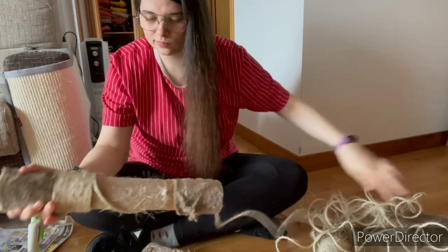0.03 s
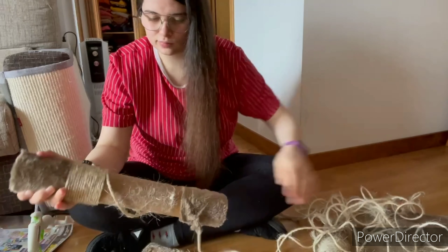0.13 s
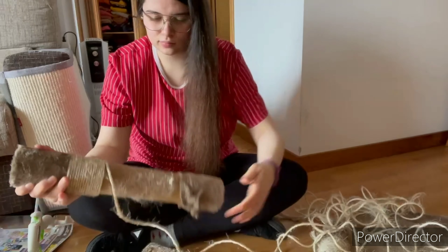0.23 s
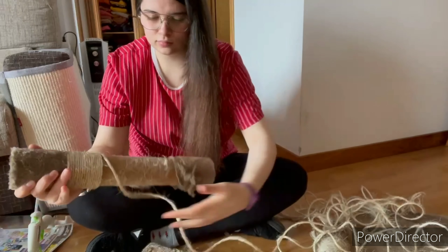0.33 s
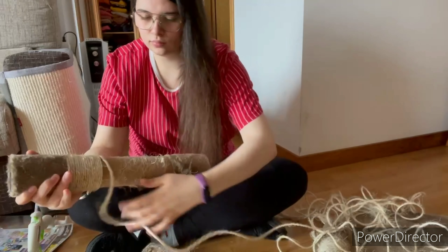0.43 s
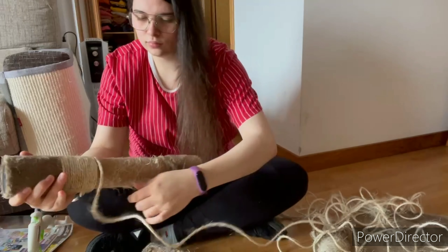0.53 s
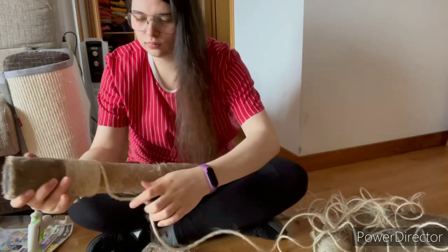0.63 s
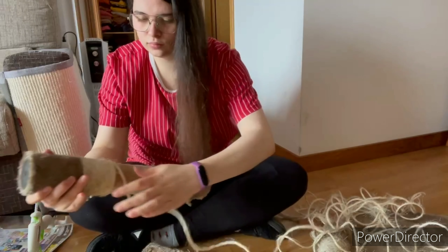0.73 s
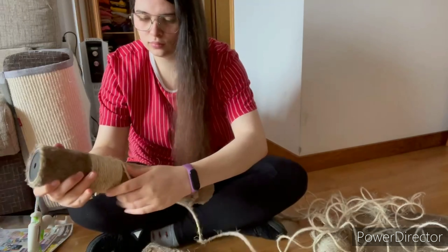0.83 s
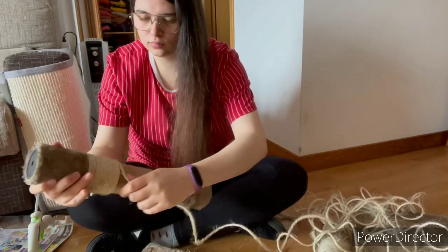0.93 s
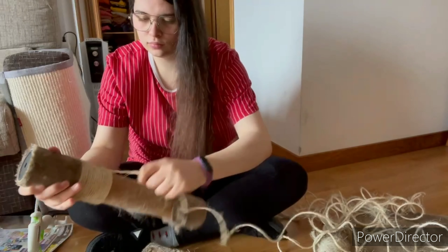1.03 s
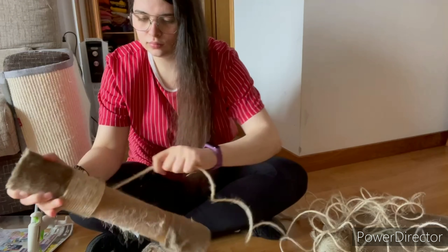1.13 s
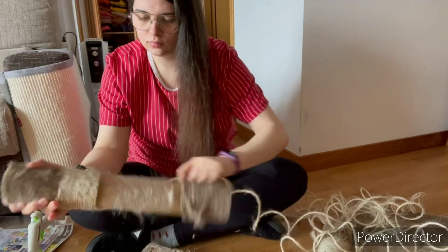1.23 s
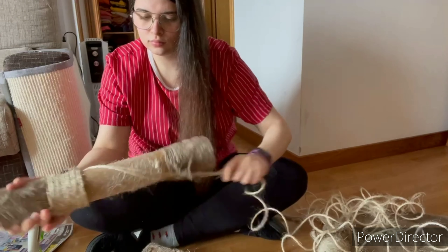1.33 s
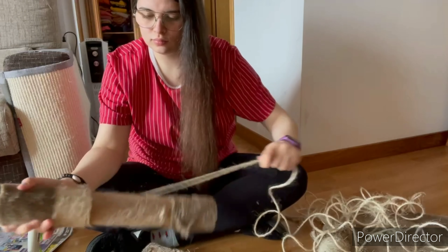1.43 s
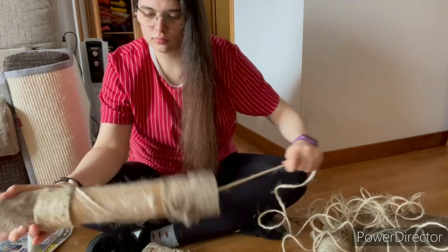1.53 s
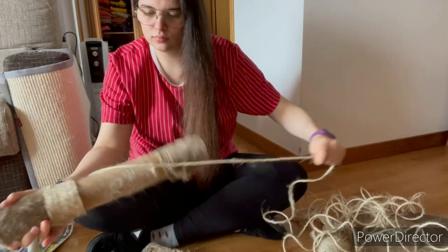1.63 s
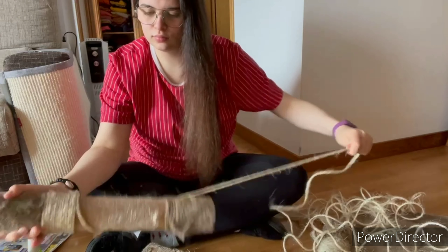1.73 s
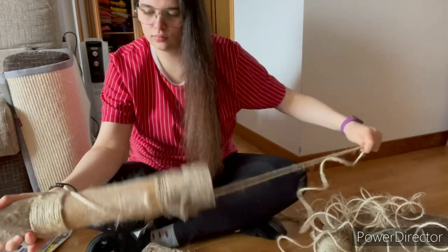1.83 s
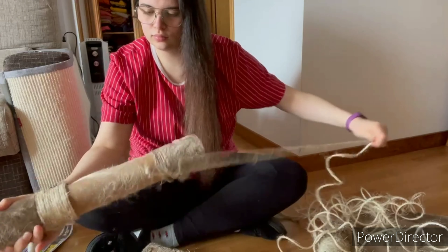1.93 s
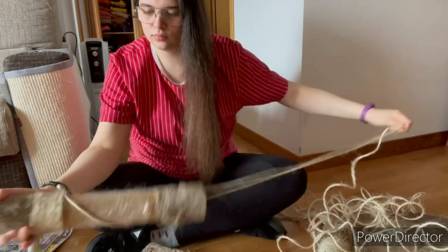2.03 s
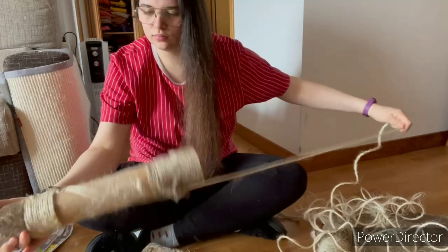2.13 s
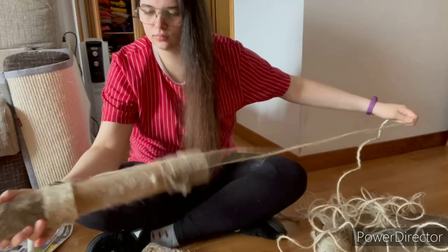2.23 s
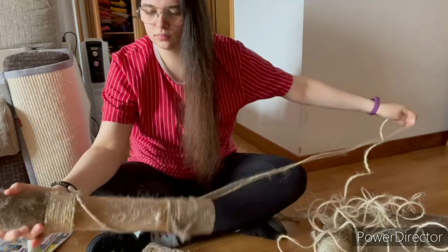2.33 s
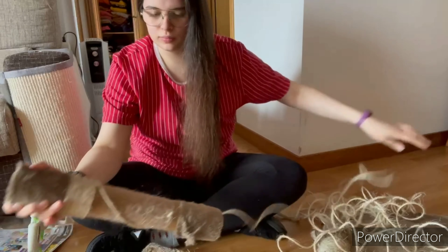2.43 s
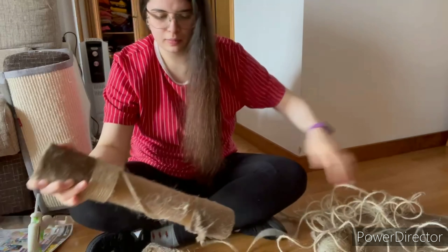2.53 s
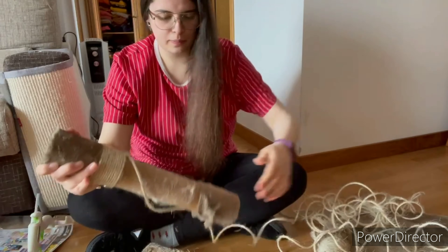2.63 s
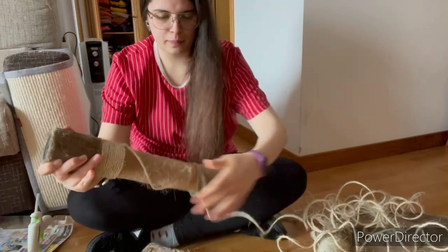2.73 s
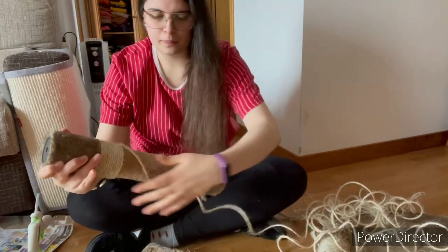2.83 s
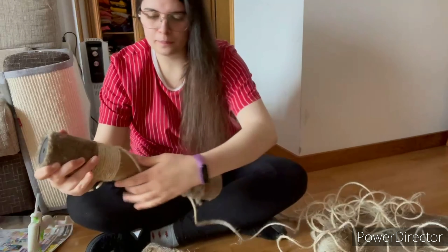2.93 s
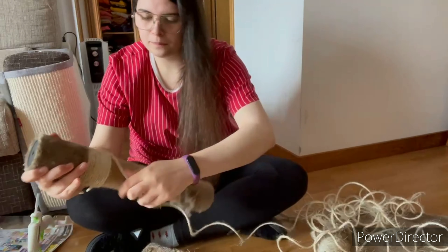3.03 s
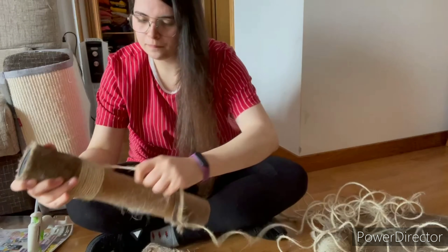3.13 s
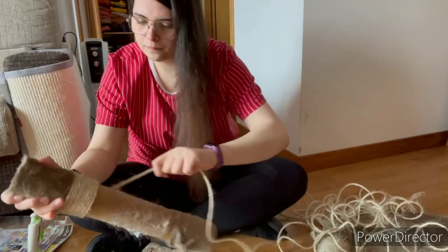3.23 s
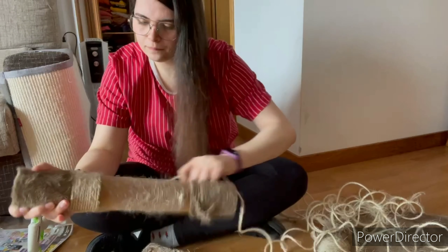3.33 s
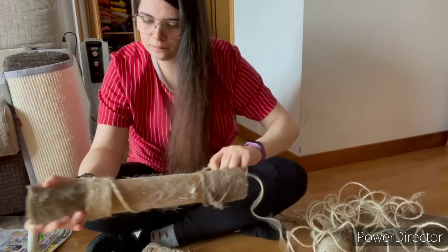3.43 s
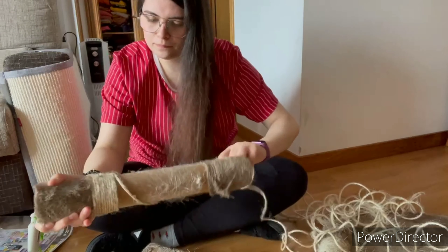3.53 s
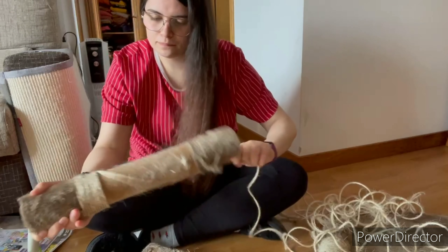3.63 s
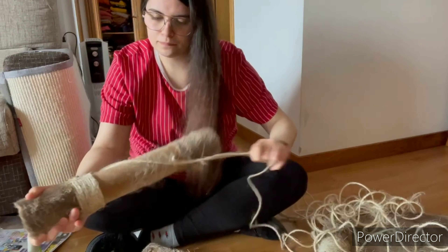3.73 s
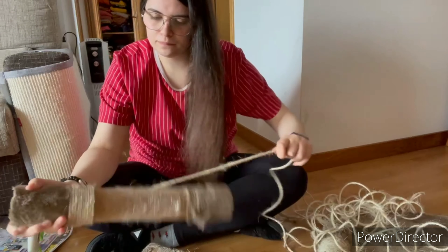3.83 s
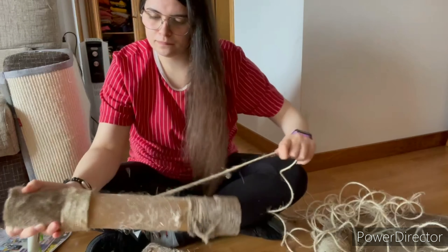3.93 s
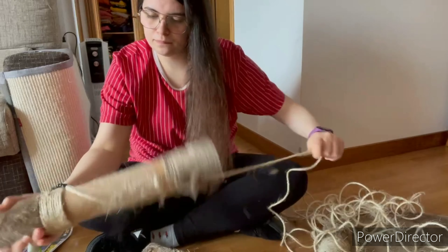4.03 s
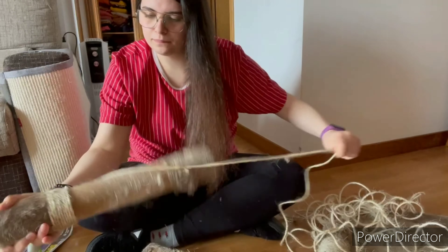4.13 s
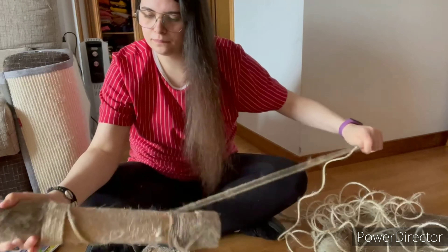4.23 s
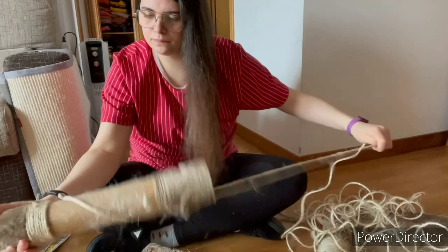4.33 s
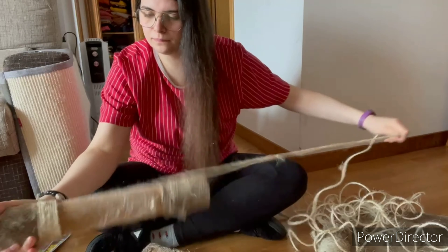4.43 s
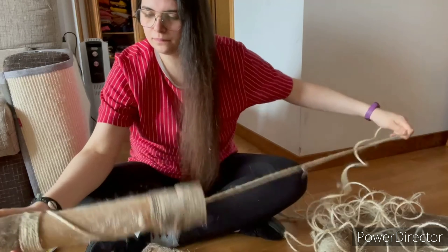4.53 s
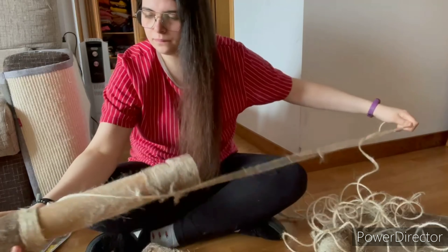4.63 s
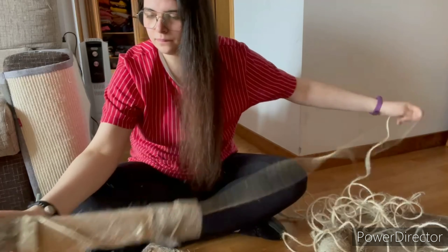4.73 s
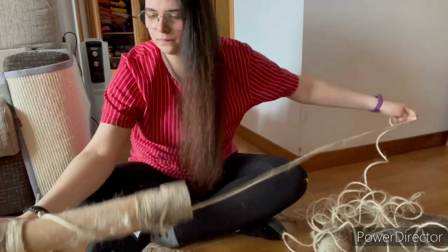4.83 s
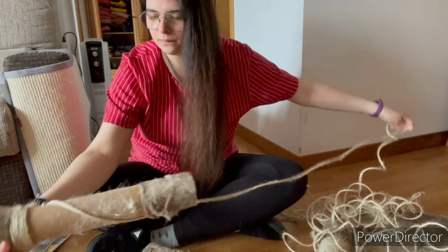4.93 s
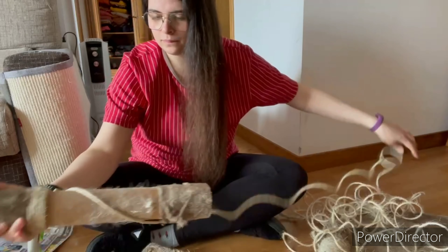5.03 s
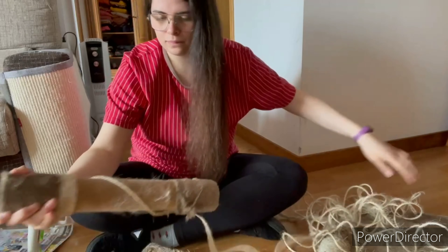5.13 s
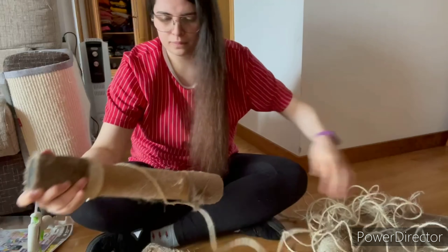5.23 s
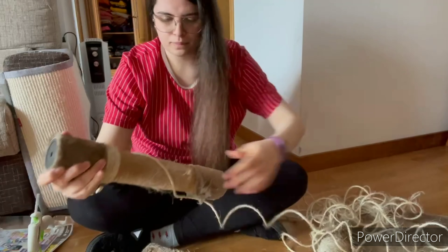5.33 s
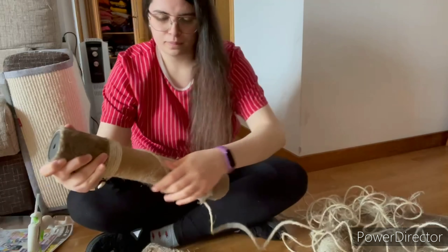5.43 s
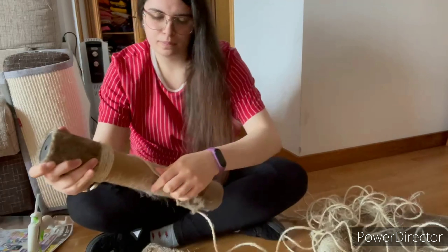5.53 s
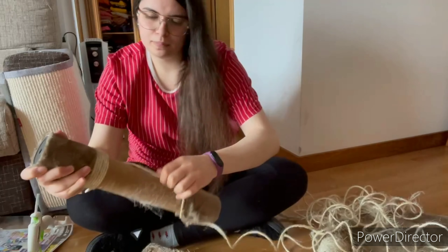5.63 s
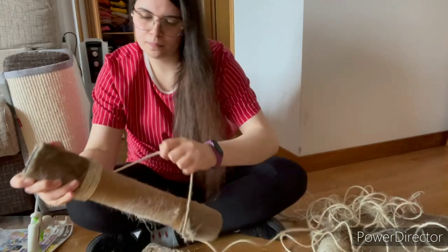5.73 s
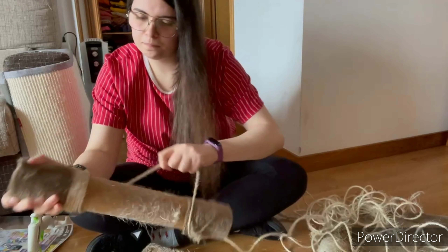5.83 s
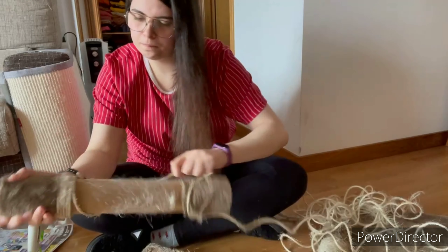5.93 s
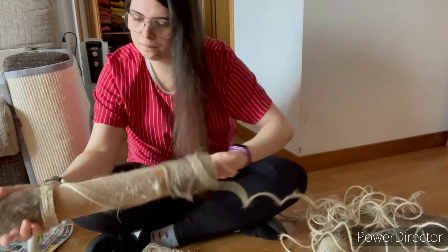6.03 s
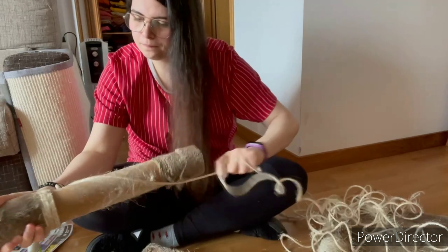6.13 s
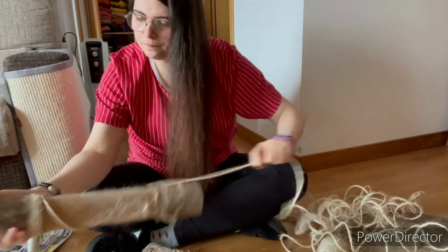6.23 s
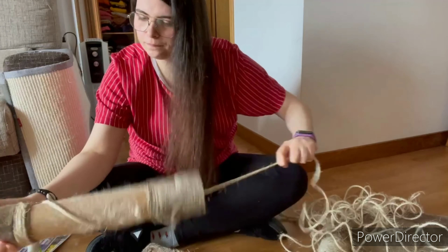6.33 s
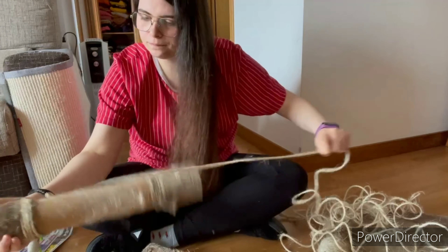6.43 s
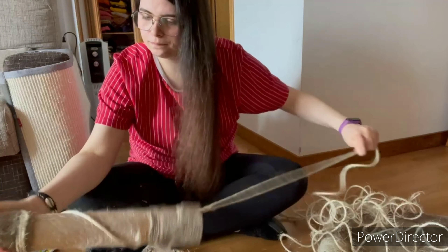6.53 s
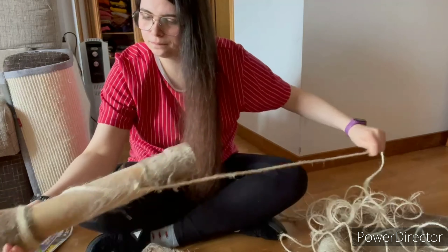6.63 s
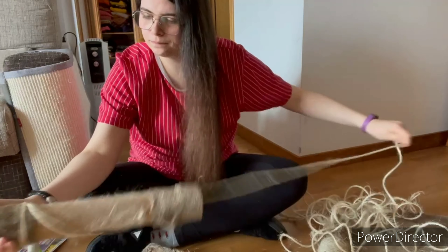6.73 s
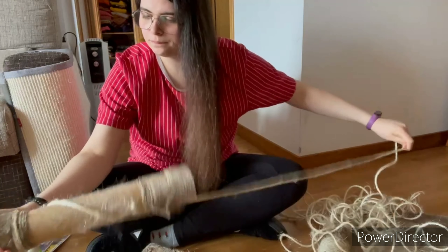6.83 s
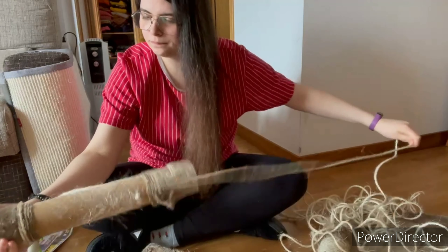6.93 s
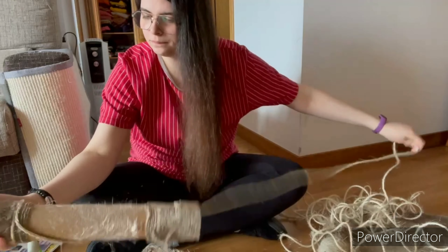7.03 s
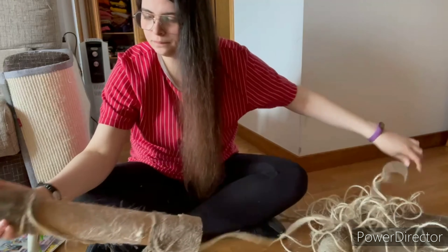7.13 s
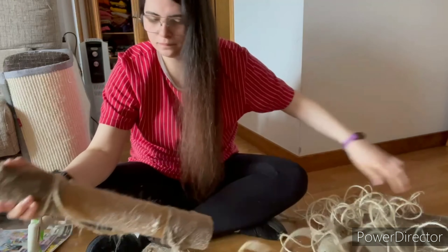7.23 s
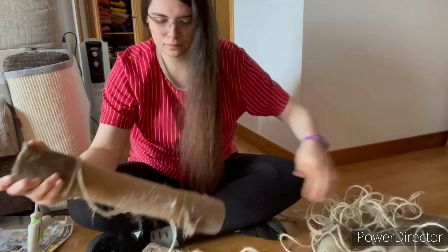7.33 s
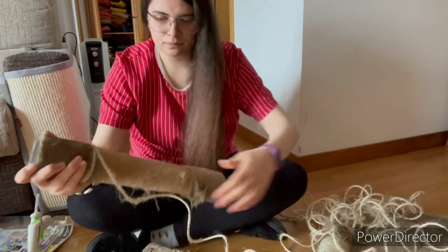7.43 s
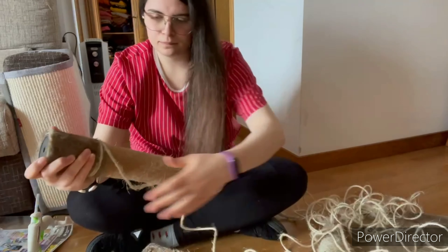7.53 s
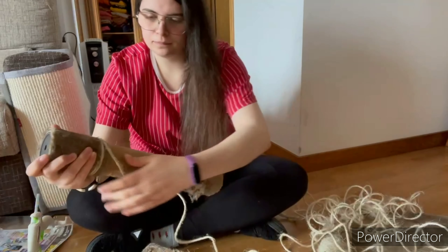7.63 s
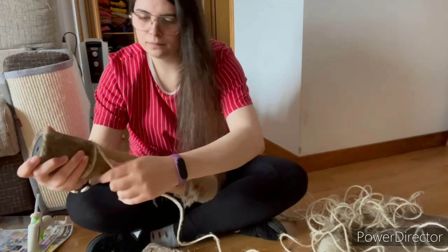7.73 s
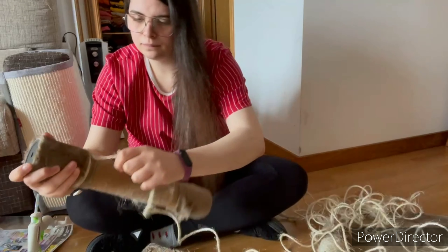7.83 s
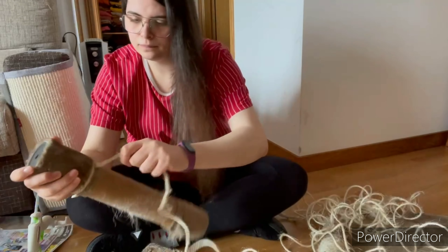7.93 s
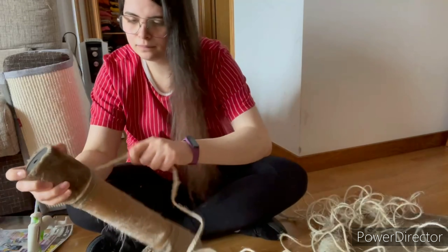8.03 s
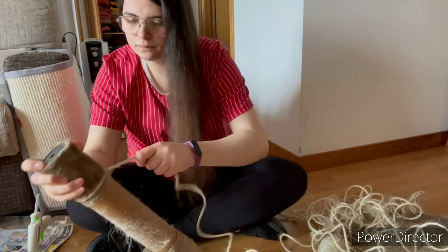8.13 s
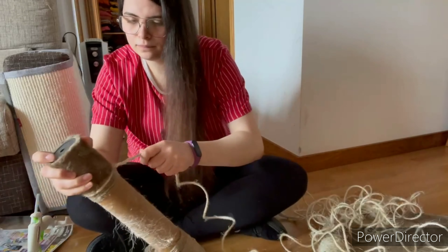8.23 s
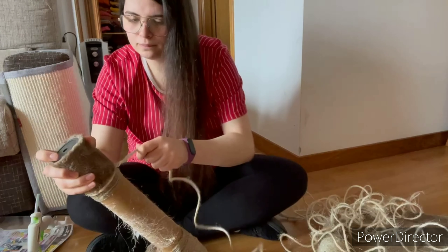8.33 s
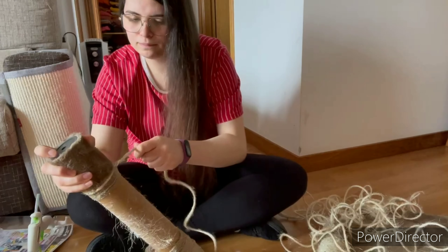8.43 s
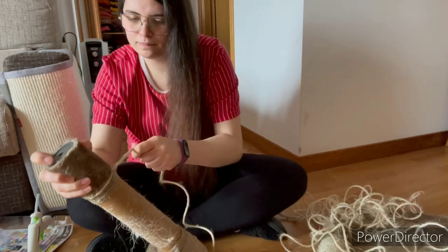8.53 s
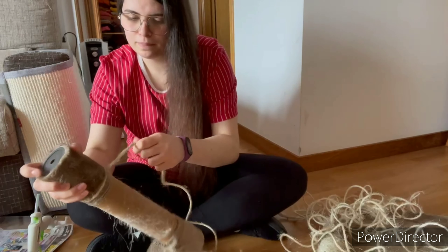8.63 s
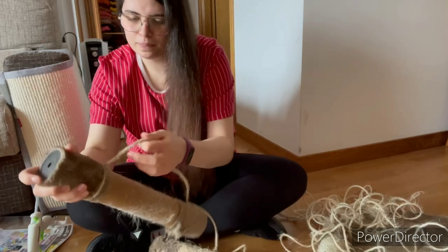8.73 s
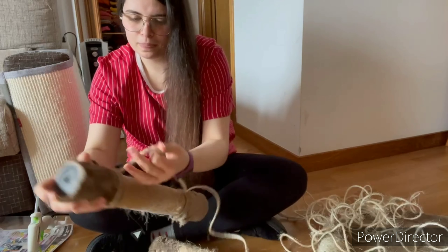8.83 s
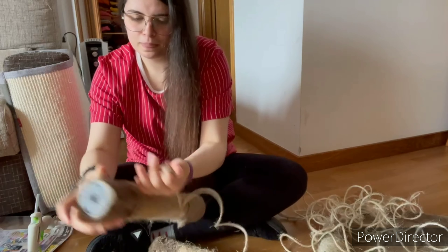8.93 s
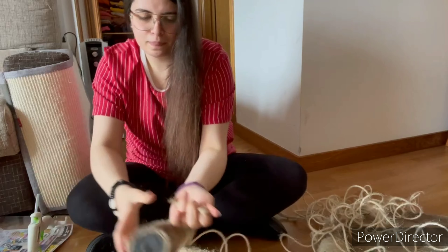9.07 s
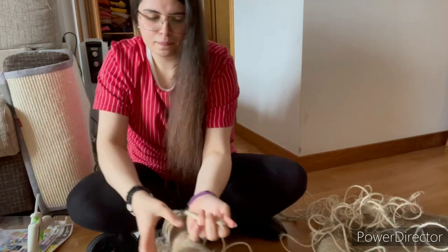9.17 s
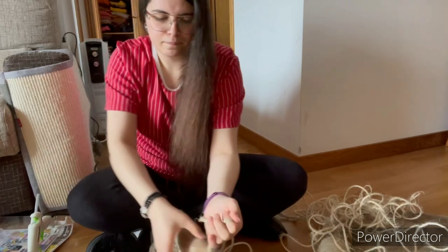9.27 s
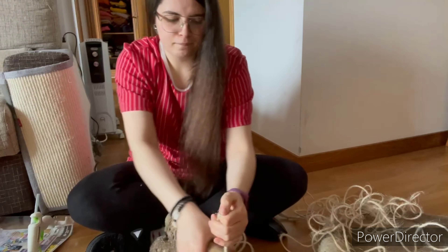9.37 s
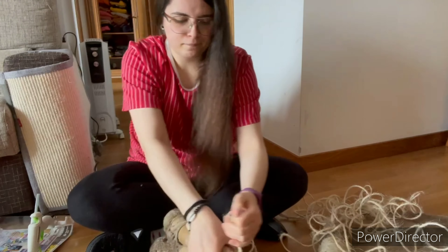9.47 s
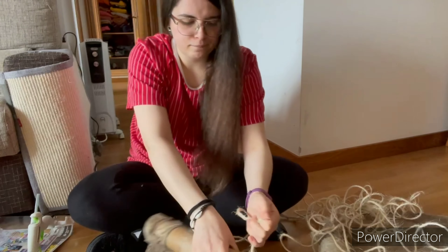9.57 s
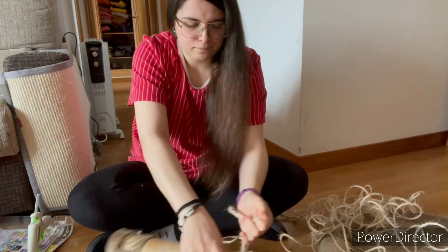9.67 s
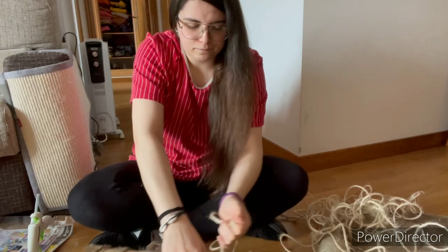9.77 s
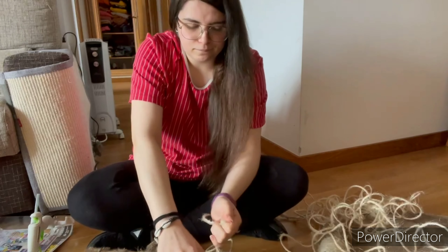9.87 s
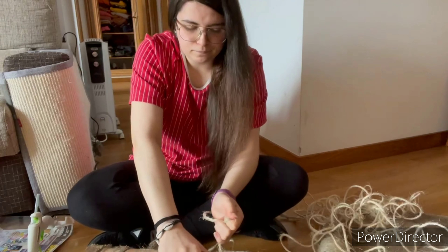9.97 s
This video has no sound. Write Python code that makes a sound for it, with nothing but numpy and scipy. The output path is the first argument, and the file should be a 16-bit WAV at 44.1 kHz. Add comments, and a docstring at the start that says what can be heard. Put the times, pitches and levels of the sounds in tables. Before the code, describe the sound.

Three close, dry ripping pulls of stiff rope from a glued tube, separated by soft handling and bumps, then faint rustles and a final thud.

```python
"""Old sisal rope is pulled off a cardboard scratching post in a small bare room, close enough that the direct
sound outweighs the reverberation. Glue and fibres tear as noise bursts that ring the resonances of the hollow tube.
Before, between and after three long pulls the rope rustles and fingers rub and squeak; during the pulls and
outside them fibres tick, strands crack, and the post knocks on hands and floor as decaying modes.
Floor rumble and quiet room noise lie underneath.
A phone with two microphone ports listens; its treble reaches the ports out of step."""
import sys
import numpy as np
from scipy import signal
from scipy.fft import rfft, irfft, next_fast_len
from scipy.io import wavfile
from scipy.ndimage import uniform_filter1d, map_coordinates

SR = 44100
rng = np.random.default_rng(int(sys.argv[2]) if len(sys.argv) > 2 else 0)


def dump(signal):
    """Clip the signal to [-1, 1] and save it as 16-bit WAV at the path in sys.argv[1]."""
    limited = np.clip(np.atleast_2d(signal).T, -1, 1)
    pcm = np.round(limited * 32767).astype(np.int16)
    wavfile.write(sys.argv[1], SR, pcm)


N = 441000

# All level_db columns are relative: the functions add the gain of each layer.
# floor boards under the moving body: [start_s, level_db]
RUMBLE = [(0.0, -68), (0.47, -74), (0.53, -61.5), (0.8, -76), (1.42, -63), (1.92, -66), (2.36, -58.5),
          (2.48, -72), (3.31, -88.5), (3.42, -59), (3.56, -67), (4.51, -58.5), (4.79, -63.5), (4.93, -57.5),
          (5.26, -75), (6.13, -59), (6.29, -75), (6.35, -65.5), (8.1, -76), (8.19, -55.5), (8.8, -83),
          (9.16, -62), (9.3, -70), (9.83, -74), (9.94, -51), (10.0, -51)]
# rumble spectrum: [frequency_hz, level_db]
BOARDS = [(25, -25), (38, -8.5), (48, -3), (60, -9), (95, -12.5), (130, -43.5)]
SHIFT_DB, SHIFT_RATE = 3, 6  # weight shifts on the boards: depth in dB, random knots per second
# one floor mode hums while the body leans over: [start_s, level_db]
SWAY = [(8.84, -85), (8.95, -67), (9.1, -61), (9.45, -62.5), (9.6, -66), (9.8, -72), (9.9, -80)]
SWAY_HZ, SWAY_WAVER_HZ = 48, 2.5  # centre pitch, scale of its random waver
# quiet room spectrum: [frequency_hz, level_db]
HUSH = [(25, -14.5), (60, 3.5), (200, -0.5), (500, -9), (1000, -10.5), (2500, -23.5), (5000, -26),
        (11000, -25), (11900, -46)]

# hands and loose rope before, between and after the pulls: [start_s, rustle_level_db, treble_over_it_db,
# low_rasp_over_it_db]
HANDLING = [
    [(0.0, -67.5, -12.5, -6), (0.172, -100.5, -5, 7), (0.484, -94, -19, -5), (0.534, -62, -1.5, -9.5),
     (0.69, -99, -18, 5), (0.848, -94, -23, 2), (0.87, -77.5, 5, -20), (0.93, -62.5, -8.5, -14),
     (0.962, -55.5, 4, -5), (1.05, -79, -5, 8)],
    [(2.56, -89, 1.5, -16.5), (2.586, -81, -3, 18), (2.596, -53, -28, -3), (2.744, -83, -20, 10),
     (2.792, -104, -11, 5), (2.97, -102, -11, -7), (2.992, -75.5, 8, -28), (3.076, -69.5, 2.5, -26),
     (3.112, -85, 7, 0), (3.16, -75.5, -1, -15)],
    [(5.11, -86.5, 2, 3), (5.504, -93.5, -4.5, 8.5), (5.53, -65, -0.5, -4), (5.58, -65, -4, -5),
     (5.604, -42.5, -6.5, -10), (5.678, -73, -3, 0.5), (5.716, -58, -6, -2), (5.732, -68.5, -10, -1),
     (5.798, -57.5, -9.5, -9.5), (5.84, -59, -11, 2)],
    [(7.31, -91, 17, 5), (7.326, -69.5, -6, 7), (7.408, -78.5, 4, -7), (7.42, -60.5, -24, 3.5),
     (7.63, -88.5, -20, 8), (7.67, -70.5, -19, 7), (7.754, -70, -0.5, 7.5), (7.812, -54, -19, 0.5),
     (7.884, -77.5, -1, -2), (8.04, -64, -15, -10)],
    [(8.06, -50, -11.5, -3), (8.094, -60, -6, -7), (8.21, -72, -7, -2.5), (8.444, -83.5, -5.5, 8.5),
     (8.51, -93.5, 14.5, 16), (8.546, -97, 6, -14), (8.658, -72.5, -6.5, -5), (8.784, -82.5, 3, -21),
     (8.8, -88, 5, -7), (9.0, -80, 9.5, -23)],
    [(9.01, -71, 2.5, -10), (9.094, -78.5, 3, -13), (9.108, -63, -10.5, -8), (9.31, -74.5, -4, -5),
     (9.37, -70, -1, -11), (9.385, -65, -6, -6), (9.53, -66.5, -4.5, -3), (9.704, -63, -12, 0),
     (9.724, -71.5, -8, -2), (9.852, -69.5, -1, -5), (9.88, -58, -10, 1), (10.0, -66, -8, -2)],
]
# the three long pulls: [start_s, tear_level_db, then over it: tube_boom_db, low_rasp_and_second_resonance_db,
# treble_db]
PULLS = [
    [(1.05, -66.5, -15, -13, -1), (1.112, -49.5, -3, -2, -11), (1.15, -63, 6, -4, -1.5),
     (1.186, -55.5, 11.5, 2.5, 0), (1.22, -57.5, 10, 3.5, 4), (1.238, -50.5, 4, 5, -4),
     (1.254, -55, 0, 6.5, 1), (1.308, -43, -13, -9, 0), (1.324, -47, -2, 1, -5),
     (1.35, -40.5, -16.5, -5.5, -7.5), (1.374, -40, -2.5, -13, -6.5), (1.488, -50, -9.5, 0.5, -6),
     (1.53, -39.5, 2.5, -3.5, -6), (1.562, -46.5, -0.5, -7, -10), (1.6, -42.5, -13, -4, -6),
     (1.738, -42.5, -11.5, -13, -8), (1.796, -35.5, -10, -2.5, -9.5), (1.848, -44.5, -9.5, -10, -4.5),
     (1.91, -41, -10.5, -3, -11.5), (1.952, -48.5, -7.5, -12, -8.5), (2.01, -42, -15, 0, -8),
     (2.11, -39, -5.5, -0.5, -5.5), (2.16, -48, -4.5, -6, -6), (2.224, -37.5, -12.5, -12.5, -10.5),
     (2.278, -53, -16.5, -6.5, -4), (2.29, -49, -14, -9, -7), (2.324, -52, -6, 1.5, -3),
     (2.378, -44.5, -5, 3.5, -4.5), (2.524, -81.5, -17, -1.5, -4), (2.55, -89, -1, 4, -5)],
    [(3.17, -69, -31, -10, -4), (3.256, -50.5, 6, -3.5, -2), (3.336, -55, 5, 0.5, -1),
     (3.346, -50.5, -7.5, -4.5, -5), (3.416, -44.5, -1, 4, -6), (3.448, -50, -2.5, 1, -5),
     (3.572, -75, -9, 6, -6), (3.604, -47, -6, 0, -17), (3.652, -69.5, 0, -3.5, -1),
     (3.668, -54, -22, -2, -5), (3.894, -42.5, -6.5, -8.5, -8.5), (3.976, -58.5, 1.5, 1.5, -7),
     (4.056, -40, -17, -5.5, -5), (4.186, -49.5, -19.5, -1.5, -7.5), (4.276, -43.5, -0.5, 3, -6.5),
     (4.314, -57, -3.5, -8, -10), (4.33, -44.5, -13, -11, -6), (4.546, -43.5, -15.5, 1, -9.5),
     (4.594, -39.5, 3.5, -1, -7), (4.632, -53.5, 0.5, -8, -8), (4.658, -43, -34, -16, -11.5),
     (4.696, -45.5, -7, -6, -5), (4.718, -43.5, -22, -21, -15), (4.744, -53, -5, -19, -7.5),
     (4.772, -42.5, -9, -9, -6.5), (4.836, -55, -4, 1.5, -3), (4.858, -45, -10, -4, -6.5),
     (4.89, -51.5, -5.5, 3, -12), (4.96, -60.5, -7.5, -3, -13), (5.1, -80, 0, 11.5, -1.5)],
    [(5.85, -57.5, -5, -2, -3.5), (5.908, -54.5, 5, -2, -3.5), (5.97, -45.5, -15, -4, -7),
     (6.012, -51.5, -2.5, -10.5, -8), (6.02, -42, -15, -9, -8), (6.036, -54, -4.5, 6, -3),
     (6.072, -44, -24, -1, -10.5), (6.102, -48.5, 2, -13.5, -6), (6.246, -46.5, -22.5, -3, -7.5),
     (6.262, -39.5, -26, -1, -11), (6.282, -46, -12.5, -5.5, -7.5), (6.388, -41.5, -15.5, -11.5, -7),
     (6.466, -52, -3.5, 8, -4), (6.488, -40, -17.5, -17, -13), (6.574, -49.5, -8.5, 4.5, -2),
     (6.602, -43.5, -7, -1, -6), (6.66, -67, -7.5, -8, -4), (6.684, -44.5, -4, -3.5, -11),
     (6.746, -58.5, -11, -8, -5), (6.762, -46, -15.5, -1.5, -9), (6.852, -41, -9, 0, -4.5),
     (6.87, -40, -5, -3, -14), (6.874, -50, -5, 5, -9), (6.968, -57.5, -15, -3.5, -8.5),
     (6.988, -47.5, -14, 0, -9), (7.03, -55.5, 0, 6.5, -1), (7.078, -57.5, -16, 8.5, 1),
     (7.096, -67.5, 0, -1, 1), (7.168, -71, -20, 5, 0), (7.25, -100, 29.5, -1, 11.5)],
]
# gains while pulling: rasp_db, second_db and fizz_db over their columns, third_db over the tear level
PULL_COLOUR = {"rasp_db": -5.5, "second_db": -13, "third_db": -18, "fizz_db": 3.5}
# tube resonance gains while handling, over the rustle level: boom_db, second_db, third_db
HAND_COLOUR = {"boom_db": -6.5, "second_db": -10.5, "third_db": -13}
GRIP_DB, GRIP_RATE = 3, 11  # the shifting grip damps or frees resonances: depth in dB, random knots per second
# spectra of low rasp, tear and treble: [frequency_hz, level_db]
RASP = [(60, -39.5), (150, -7.5), (280, -15), (450, -9), (700, -1.5), (900, -5), (1400, -19)]
TEAR = [(700, -58.5), (900, -4.5), (1700, -0.5), (3000, -3), (4500, -12), (6000, -24.5), (9000, -37)]
FIZZ = [(2500, -22), (3800, -5), (5000, -1), (7000, -3), (9000, -3), (10500, -1.5), (11400, -4),
        (11900, -12)]
# tube resonances, the lowest a close pair, then second, third and faint high: [frequency_hz, width_hz, level_db]
BOOM = [(370.2, 12, 4), (393, 25.5, 6)]
SECOND = [(968, 25, 2), (1030, 140, 0.5)]
THIRD = [(1630, 24, -11.5), (1730, 130, -1)]
TUBE = [(2260, 490, -13), (2520, 83, -14.5)]
# room decay: [frequency_hz, t60_s]
ROOM = [(100, 0.55), (500, 0.24), (2000, 0.22), (10000, 0.16)]

# patches of glue that let go at once: [start_s, level_db, ring_hz, t60_s, treble_over_tear_db]
SNAPS = [(0.517, -44.5, 815, 0.029, 6.5), (0.948, -43, 1580, 0.034, -1.5), (1.074, -45, 1050, .03, 2),
         (1.099, -36.5, 1700, 0.086, -6.5), (1.168, -39.5, 1790, 0.033, -3), (1.184, -35, 1750, .05, -3),
         (1.231, -30, 1790, 0.028, 11), (1.348, -28.5, 1900, 0.06, 9), (1.392, -25.5, 1790, 0.048, -4),
         (1.514, -28, 1700, 0.065, -3), (1.572, -30, 2160, 0.039, -8), (1.664, -39.5, 1680, 0.021, 0),
         (1.9, -29.5, 1850, 0.055, -0.5), (2.096, -31.5, 1990, 0.049, 2), (2.191, -25.5, 1580, 0.057, 0.5),
         (2.22, -23.5, 2240, 0.043, -3.5), (2.286, -32, 2200, 0.066, -5.5), (2.363, -36.5, 2400, 0.035, -5),
         (2.596, -34.5, 773, 0.026, -21), (2.994, -47.5, 1770, 0.032, 7), (3.198, -44.5, 864, 0.056, 3.5),
         (3.254, -35.5, 1760, 0.037, -3), (3.289, -35, 2400, 0.036, 0), (3.321, -36.5, 1710, .03, -2),
         (3.344, -33, 2400, .03, -5), (3.364, -35, 2260, 0.067, -4.5), (3.398, -27, 1620, 0.053, -7),
         (3.597, -29, 1830, 0.039, 8.5), (3.667, -35, 1750, 0.055, 0.5), (3.722, -32.5, 2110, 0.048, 2.5),
         (3.858, -23.5, 2150, 0.039, -6.5), (4.001, -33, 1460, 0.062, -1), (4.053, -28.5, 2370, 0.039, 1),
         (4.134, -23.5, 1140, 0.042, -20), (4.188, -30, 2140, 0.039, -0.5), (4.215, -29, 2100, 0.1, -5),
         (4.265, -28, 947, 0.04, -6), (4.328, -36, 2380, 0.05, -3.5), (4.414, -24.5, 2600, 0.045, 0),
         (4.527, -27, 1000, 0.05, -7), (4.57, -27, 1890, 0.06, -0.5), (4.656, -27.5, 1570, 0.05, -7),
         (4.71, -21.5, 1650, 0.032, -1.5), (4.761, -31.5, 1830, 0.088, -12), (4.814, -24, 1004, 0.032, -3),
         (4.85, -29.5, 1640, 0.096, 2), (5.524, -46.5, 1690, 0.037, 0), (5.603, -23.5, 1450, 0.02, 1.5),
         (5.919, -34.5, 1030, 0.082, 7), (5.963, -24, 2324, 0.036, 5), (6.017, -28, 2035, 0.041, -0.5),
         (6.066, -24.5, 1860, 0.039, -1.5), (6.104, -27, 1986, 0.054, 1), (6.182, -30, 910, 0.052, -7.5),
         (6.257, -30.5, 1490, 0.092, -12.5), (6.313, -25.5, 2490, 0.045, -5),
         (6.343, -24.5, 1260, 0.037, -2), (6.485, -18.5, 1390, 0.047, -2), (6.677, -23.5, 1640, 0.024, 7),
         (6.758, -32, 1165, 0.04, -4), (6.833, -28.5, 986, 0.066, -12.5), (6.983, -28.5, 1220, 0.05, -5),
         (7.077, -30.5, 1070, 0.027, -20), (7.32, -50, 785, 0.041, -9.5), (7.416, -44, 870, 0.071, -13),
         (7.67, -54, 1130, 0.071, -16), (7.78, -48, 1050, .04, -9), (7.809, -35, 1060, 0.06, -1.5),
         (8.033, -30, 1720, 0.062, 4), (9.871, -40, 1790, 0.037, -3)]
SNAP_BOOM_DB, SNAP_RISE_S = -10.5, 0.0022  # tube boom over a snap's tear, time constant of the rise
# the post bumps something: [start_s, level_db, pitch_favoured_by_contact_hz, floor_thud_over_level_db]
KNOCKS = [(0.522, -41, 350, -11), (0.965, -38.5, 383, -32), (2.586, -51, 610, -22.5),
          (2.595, -26.5, 656, -44.5), (3.4034, -25.5, 750, -7), (3.425, -31.5, 397, -10),
          (3.46, -32, 325, -19), (4.872, -35, 370, -8.5), (5.236, -45, 488, -37), (6.109, -27, 370, -15),
          (6.617, -41.5, 65, -8), (7.32, -45.5, 716, -23), (7.416, -40, 540, -21), (7.432, -39.5, 620, -28),
          (7.447, -41.5, 520, -20), (7.499, -48, 560, -18), (7.657, -47.5, 516, -23),
          (8.155, -27.5, 289, -41), (8.177, -40, 318, -25), (8.2, -42, 316, -20), (8.488, -47.5, 512, -17),
          (9.112, -51, 157, 5), (9.143, -34, 63.5, -37), (9.897, -30, 164, -13)]
# modes of post and floor boards: [frequency_hz, level_db, t60_s]
BODY = [(50.7, -1.5, 0.23), (65.3, 2.5, 0.079), (102.5, 5.5, 0.065), (159, 2.5, 0.06), (201, 3.5, 0.075),
        (312, 0.5, 0.072), (351.7, -4, 0.16), (369, -5, 0.084), (513, 7, 0.028), (607, 0, 0.054),
        (708, 11.5, 0.015)]
# fingers rub along the tube: [start_s, length_s, level_db]
SCRAPES = [(0.867, 0.11, -81), (2.98, 0.13, -62), (7.855, 0.11, -70.5), (9.095, 0.07, -65),
           (9.194, .1, -70)]
SCRAPE_FADE_S = 0.024
# narrow rasp of fingers on bare cardboard: [frequency_hz, width_hz, level_db]
RUB = [(1750, 220, 0)]
# skin catches on the cardboard and squeaks for a moment: [start_s, peak_db, pitch_hz, length_s]
SQUEAKS = [(0.870, -58, 1670, 0.012), (0.908, -61, 1620, 0.013), (0.930, -43, 1595, 0.012),
           (0.952, -53, 1610, .012), (2.991, -60, 1690, .02), (3.046, -56, 1600, 0.015),
           (3.066, -47, 1627, 0.0084)]
# dry, bright ticks of single stiff fibres: [start_s, level_db]
TICKS = [(0.9612, -28), (1.0745, -44), (1.1015, -36), (1.1205, -38), (1.1325, -39), (1.169, -37),
         (1.1845, -36), (1.2306, -27), (1.4621, -35), (3.6007, -34), (4.237, -30), (4.248, -29),
         (4.329, -41), (4.415, -28), (4.6558, -28), (4.8515, -31), (5.7084, -47), (6.0187, -27),
         (6.344, -29), (6.6767, -30), (6.9864, -42), (7.3214, -57), (7.4154, -50), (7.5003, -56),
         (7.8875, -52), (8.969, -60), (9.0139, -58), (9.0434, -54), (9.1382, -52), (9.2056, -53),
         (9.238, -55), (9.3324, -56), (9.3871, -52), (9.4085, -49), (9.4429, -50), (9.4614, -50),
         (9.5534, -54), (9.5711, -43), (9.587, -50), (9.6051, -44)]
TICK_T60_S = 0.004
TICK_DB, TICK_BODY_DB, TICK_BLOW_DB = 6, 4, 15  # gain of bright edge, middle band, blow to the tube
# ends of a tick's middle band: low_hz, high_hz
TICK_BODY_HZ = [1500, 5000]
# single thick strands that break: [start_s, level_db, ring_hz]
CRACKS = [(0.9622, -20, 950), (1.229, -41, 1800), (1.4625, -22, 1720), (1.535, -17, 1760),
          (2.116, -21, 2020), (2.594, -36, 810), (3.863, -37, 2480), (4.415, -30, 1790),
          (4.86, -18.5, 1620), (5.709, -24.5, 860), (5.964, -34, 2250), (6.017, -29.5, 2050),
          (6.064, -24, 1860), (6.198, -30, 1020), (6.342, -27.5, 1240), (6.694, -19.5, 1090),
          (6.867, -13, 1260), (7.8124, -25, 1070), (8.038, -30, 1060), (8.04, -13.5, 1740),
           (9.606, -50, 1740)]

# gain of what differs between the microphone ports: [frequency_hz, gain_db]
WIDTH = [(50, -4), (300, -1), (2500, 4.5), (4200, 5), (5500, 2), (7000, -15), (8200, -15), (9200, 4.5),
         (10100, -1), (10800, -26), (12000, -40)]
# left port ahead of right: [frequency_hz, phase_rad]
LEAD = [(50, 0.1), (1000, 0.15), (2200, .5), (3800, .4), (4900, 3.1), (8200, 3.15), (9300, 4.6),
        (10000, 5.3), (10700, 6.2), (12500, 6.28)]
# level balance of the ports: [frequency_hz, left_minus_right_db]
BALANCE_DB = [(60, -2), (200, -2.5), (600, -.6), (2000, -1.5), (6000, 0), (12000, 0.3)]
TOP_HZ = 12000  # upper band limit of the microphone


def amp(db):
    """Decibels to gain."""
    return 10 ** (np.asarray(db) / 20)


def unit(x):
    """Scaled to rms 1."""
    return x / np.sqrt(np.mean(x ** 2) + 1e-20)


def along(points, hz):
    """Interpolate (Hz, value) points on a log frequency axis."""
    f, v = np.transpose(points)
    return np.interp(np.log(hz + 1), np.log(f + 1), v)


def shape(points, hz):
    """Gain of a spectrum that fades to -120 dB outside its ends."""
    below = (points[0][0] / 2, -120)
    above = (points[-1][0] * 1.25, -120)
    return amp(along([below, *points, above], hz))


def curves(rows):
    """One value per sample for each column after the time."""
    s, *cols = np.transpose(rows)
    return [np.interp(np.arange(N) / SR, s, c) for c in cols]


def wobble(rate):
    """A smooth random curve, rate knots a second."""
    knots = rng.standard_normal(int(N * rate / SR) + 4)
    return map_coordinates(knots, [np.arange(N) * rate / SR])


def filtered(x, response):
    """x times a complex response of frequency, zero-padded."""
    m = next_fast_len(N + SR // 2)
    return irfft(rfft(x, m) * response(np.fft.rfftfreq(m, 1 / SR)), m)[..., :N]


def resonances(modes, f):
    """Causal response of parallel second-order (Hz, width, dB) resonances."""
    return sum(amp(db) * 1j * f * w / (c * c - f * f + 1j * f * w) for c, w, db in modes)


def background():
    """Floor rumble and hum that follow the body's movements, over the quiet room at both ports."""
    rumble = unit(filtered(rng.standard_normal(N), lambda f: shape(BOARDS, f)))
    hush = unit(filtered(rng.standard_normal((2, N)), lambda f: shape(HUSH, f)))
    sway_db = curves([(0, -120), *SWAY, (10, -120)])[0] + 3 + 1.5 * wobble(8)
    sway_hz = SWAY_HZ + SWAY_WAVER_HZ * wobble(8)
    hum = amp(sway_db) * np.sin(2 * np.pi * np.cumsum(sway_hz) / SR)
    rumble_db = curves(RUMBLE)[0] + SHIFT_DB * wobble(SHIFT_RATE)
    return hum + amp(rumble_db) * rumble + amp(-73.5 + 1.3 * wobble(1)) * hush


def spans(tables):
    """Gain of a level curve that sounds only inside its tables, then that gain raised by each further column."""
    t = np.arange(N) / SR
    inside = sum((t >= rows[0][0]) & (t <= rows[-1][0]) for rows in tables) > 0
    level_db, *over_db = curves(np.vstack(tables))
    gate = uniform_filter1d(1. * inside, size=882)  # 20 ms edges
    return gate * amp(level_db + [0 * t, *over_db])


def patchy(x, patchy_db):
    """Colour that shifts from tuft to tuft: random gain in patches of frequency and time."""
    z = signal.stft(x, nperseg=256)[2]
    field = uniform_filter1d(rng.standard_normal(z.shape), size=7, axis=0)
    field = uniform_filter1d(field, size=5, axis=1)
    return unit(signal.istft(z * amp(patchy_db * unit(field)), nperseg=256)[1][:N])


def fibres(clump_db, spike_db):
    """Breaking fibres: noise whose size clumps over milliseconds; thick strands add short spikes, fine hairs none."""
    clumps = amp(clump_db * (wobble(45) + wobble(260)))
    spikes = amp(spike_db * np.abs(wobble(2500)) ** 2)
    strands, hairs = rng.standard_normal((2, N))
    return patchy(clumps * spikes * strands, patchy_db=2.5), patchy(clumps * hairs, patchy_db=1.8)


def crackle(level_db, count):
    """Separate fibres pop at random moments: damped blips of a few cycles, a few much larger than the rest."""
    u, t = rng.random((count, 3)), np.arange(260) / SR
    start = (u[:, 0] * N).astype(int)
    hz = 900 * amp(15 * u[:, 1:2])
    size = amp(level_db[start] - 4.6 * np.log(u[:, 2] + 0.035))[:, None]
    envelope = size * amp(-13 * hz * t) * (1 - np.exp(-6 * hz * t))
    blips = envelope * np.sin(2 * np.pi * hz * t)
    places = start[:, None] + np.arange(len(t))
    return np.bincount(places.ravel(), blips.ravel(), N + len(t))[:N]


def rope():
    """Fibre breaks are heard directly and through each resonance of the tube, which the grip damps or frees."""
    pull, boom, low, fizz = spans(PULLS)
    hand, treble, rasp = spans(HANDLING)

    def gripped(tear, name):
        """Drive of one resonance under the shifting grip."""
        drive = tear * amp(PULL_COLOUR[name]) + hand * amp(HAND_COLOUR[name])
        return drive * amp(GRIP_DB * wobble(GRIP_RATE))

    strands, hairs = fibres(clump_db=2.0, spike_db=0.75)
    snap, snap_fizz, snap_boom, ring = bursts()
    tearing = amp(-2.0) * pull + amp(-1.0) * hand
    bright = fizz * amp(PULL_COLOUR["fizz_db"]) + amp(5.5) * treble + snap_fizz
    rasping = low * amp(PULL_COLOUR["rasp_db"]) + rasp + 0.38 * snap
    boom_grip = amp(GRIP_DB * wobble(2 * GRIP_RATE))
    booming = (boom + hand * amp(HAND_COLOUR["boom_db"])) * boom_grip + snap_boom
    paths = [  # (noise, envelope, response)
        (hairs, snap, lambda f: shape(TEAR, f)),
        (strands, tearing, lambda f: shape(TEAR, f) * (1 + resonances(TUBE, f))),
        (hairs, bright, lambda f: shape(FIZZ, f)),
        (hairs, rasping, lambda f: shape(RASP, f)),
        (strands, booming, lambda f: resonances(BOOM, f)),
        (strands, gripped(low, "second_db"), lambda f: resonances(SECOND, f)),
        (strands, gripped(pull, "third_db"), lambda f: resonances(THIRD, f)),
        (strands, scrapes(), lambda f: resonances(RUB, f))]
    pops = crackle(20 * np.log10(pull + hand + snap / 2 + 1e-9) + 1.5, count=3500)
    # dividing by the rms of the steady filtered noise lets each envelope set its path's level
    layers = sum(filtered(env * x, path) / np.std(filtered(x, path)) for x, env, path in paths)
    return ring + pops + layers


def room(x):
    """Reverberation at both ports: decaying noise, with a new tail for every third of a second."""
    out, step = np.zeros((2, N + 2 * SR)), SR // 3
    for start in range(0, N, step):
        hz, t, z = signal.stft(rng.standard_normal((2, SR // 2)), SR, nperseg=256)
        decay = amp(-60 * t / along(ROOM, hz)[:, None])
        tail = signal.istft(z * decay, SR, nperseg=256)[1]
        tail = tail / np.linalg.norm(tail[0])
        wet = signal.fftconvolve(x[None, start:start + step], tail, axes=1)
        out[:, start + 200:][:, :wet.shape[1]] += wet  # 200 samples after the direct sound
    return out[:, :N]


def bursts():
    """Snaps rise fast and decay: envelopes for tear, treble and tube boom, and each snap's own ring."""
    env, ring, t = np.zeros((3, N + SR)), np.zeros(N + SR), np.arange(SR // 4) / SR
    glue = rng.standard_normal(N + SR)
    for s, db, hz, t60, fizz_db in SNAPS:
        i = round(s * SR)
        tear = amp(db - 10.5 - 60 * t / max(t60, .008)) * (1 - np.exp(-t / SNAP_RISE_S))
        env[:, i:i + len(t)] += amp([[0], [fizz_db], [SNAP_BOOM_DB]]) * tear
        # the freed piece of rope and wall rings briefly at its own pitch
        b, a = signal.iirpeak(hz, 5, SR)
        ring[i:][:len(t)] += amp(18) * signal.lfilter(b, a, tear * glue[i:][:len(t)])
    return *env[:, :N], ring[:N]


def knocks():
    """Each bump rings the modes near the pitch that its contact favours, and thuds in the low floor modes."""
    out, t = np.zeros(N + SR), np.arange(SR // 2) / SR
    luck = rng.normal(0, 0.54, (len(KNOCKS), len(BODY)))  # dB per bump and mode
    # bending waves in the boards: high frequencies arrive first, so the front of a thud falls in pitch
    front_hz = 90 + 1300 * np.exp(-t / 0.00369)
    front = np.sin(2 * np.pi * np.cumsum(front_hz) / SR) * amp(-60 * t / 0.072)
    rise = 1 - np.exp(-t / 0.0031)
    for (s, db, centre_hz, thud_db), scatter_db in zip(KNOCKS, luck):
        place = out[round(s * SR):][:len(t)]
        place += amp(db + thud_db - 4.0) * front
        for (hz, mode_db, t60), d in zip(BODY, scatter_db):
            # modes weaken with each octave from the contact pitch and from the thud's centre
            contact = amp(-16 * abs(np.log2(hz / centre_hz)) - 3.5)
            thud = amp(thud_db - 0.5 - 8.9 * abs(np.log2(hz / 170)))
            decay = amp(db + mode_db + d - 60 * t / t60)
            place += (contact + thud) * decay * np.sin(2 * np.pi * hz * t) * rise
    return out[:N]


def scrapes():
    """Envelope of the finger rubs: fade in, hold, fade out."""
    t, out = np.arange(N) / SR, np.zeros(N)
    for s, length, db in SCRAPES:
        to_edge = np.minimum(t - s, s + length - t)
        out += amp(db) * np.clip(to_edge / SCRAPE_FADE_S, 0, 1)
    return out


def squeaks():
    """Skin squeaks as short sine tones that swell and fade."""
    t, out = np.arange(N) / SR, np.zeros(N)
    for s, db, hz, length in SQUEAKS:
        swell = np.sin(np.pi * np.clip((t - s) / length, 0, 1)) ** 2
        out += amp(db) * swell * np.sin(2 * np.pi * hz * t)
    return out


def tube_wall(blows):
    """Single-sample blows ring the second, third and high tube resonances."""
    return filtered(blows, lambda f: resonances(SECOND + THIRD + TUBE, f))


def ticks():
    """Each tick is a few milliseconds of decaying broad noise that also taps the tube wall."""
    out, blows, t = np.zeros(N + SR), np.zeros(N), np.arange(SR // 200) / SR
    b, a = signal.butter(1, TICK_BODY_HZ, "band", fs=SR)
    for (s, db), noise in zip(TICKS, rng.standard_normal((len(TICKS), len(t)))):
        click = amp(-60 * t / TICK_T60_S) * noise
        edge = np.diff(click, prepend=0)  # differencing brightens
        body = signal.lfilter(b, a, click)
        place = out[round(s * SR):][:len(t)]
        place += amp(db + TICK_DB) * edge / np.abs(edge).max()
        place += amp(db + TICK_BODY_DB) * body / np.abs(body).max()
        blows[round(s * SR)] = amp(db + TICK_BLOW_DB)
    return out[:N] + tube_wall(blows)


def cracks():
    """A breaking strand: a few milliseconds of bright noise, its own short ring and a blow to the tube wall."""
    out, blows, t = np.zeros(N + SR), np.zeros(N), np.arange(SR // 20) / SR
    for (s, db, hz), noise in zip(CRACKS, rng.standard_normal((len(CRACKS), len(t)))):
        bright = np.diff(uniform_filter1d(noise, size=3), prepend=0)
        click = amp(1.5 - 60 * t / 0.0054) * bright
        ring = amp(-12 - 60 * t / 0.0088) * np.sin(2 * np.pi * hz * t)
        out[round(s * SR):][:len(t)] += amp(db) * (click + ring) * (1 - np.exp(-t / 0.0003))
        blows[round(s * SR)] = amp(db + 19.0)
    return out[:N] + tube_wall(blows)


def scene():
    """Rope, knocks and dry ticks, the room's answer to rope and knocks, and the background."""
    tear = rope() + cracks() + squeaks()
    bumps = knocks()
    wet = room(amp(-5.5) * tear + amp(-6) * bumps)
    return tear + bumps + ticks() + wet + background()


def record(dry):
    """The ports share the treble but with a phase lead; the deep bass is cut and nothing passes above the band limit."""
    mid = (dry[0] + dry[1]) / 2
    side = filtered((dry[0] - dry[1]) / 2, lambda f: amp(along(WIDTH, f)))
    half = np.array([[.5], [-.5]])  # left and right each take half of the difference

    def microphone(f):
        """Port balance and phase, low cut and band limit."""
        ports = amp(half * along(BALANCE_DB, f)) * np.exp(1j * half * along(LEAD, f))
        low_cut = f ** 4 / (f ** 4 + 36 ** 4)
        top = np.cos(np.pi / 2 * np.clip((f - TOP_HZ) / 350 + 1, 0, 1)) ** 2
        return ports * low_cut * top

    return filtered(np.array([mid + side, mid - side]), microphone)


dry = scene()
out = record(dry)
dump(out)
```